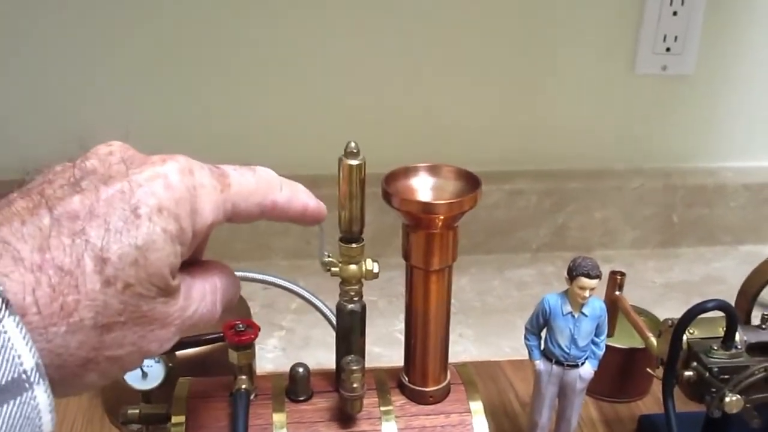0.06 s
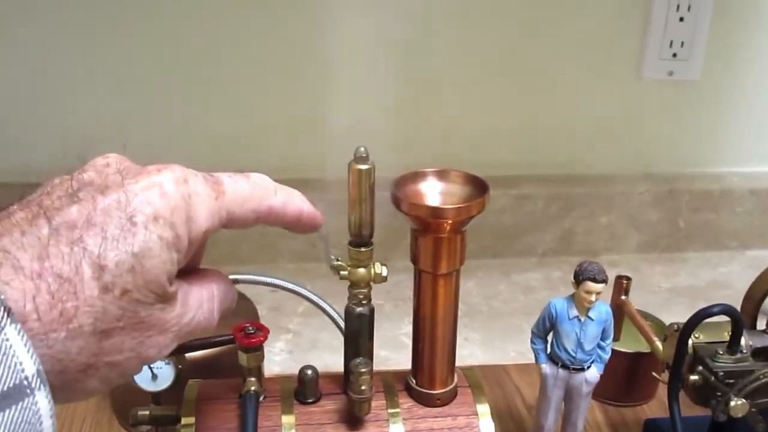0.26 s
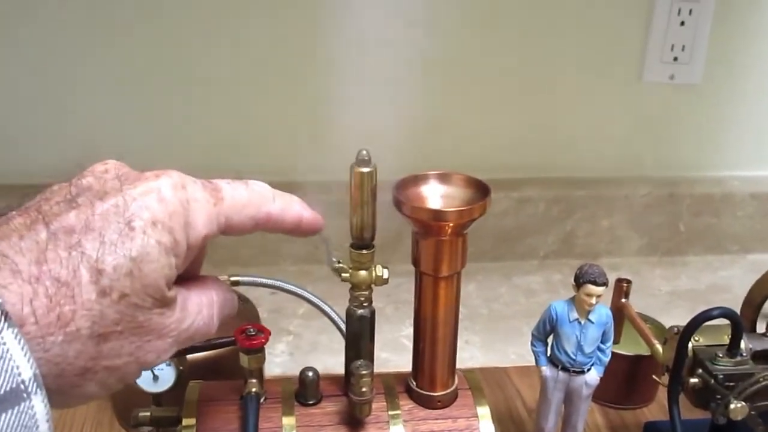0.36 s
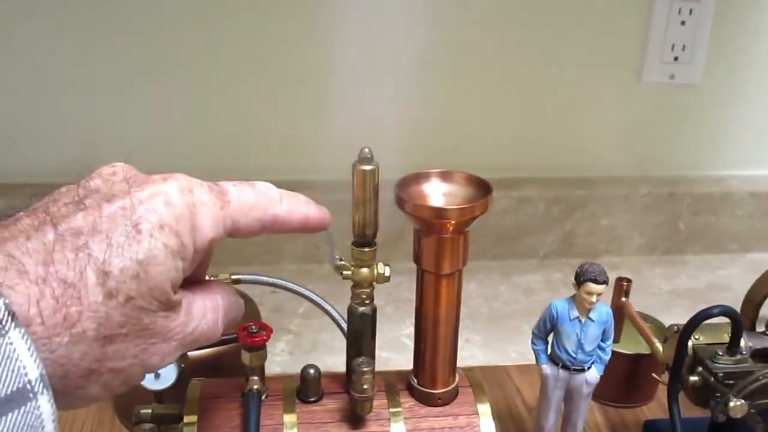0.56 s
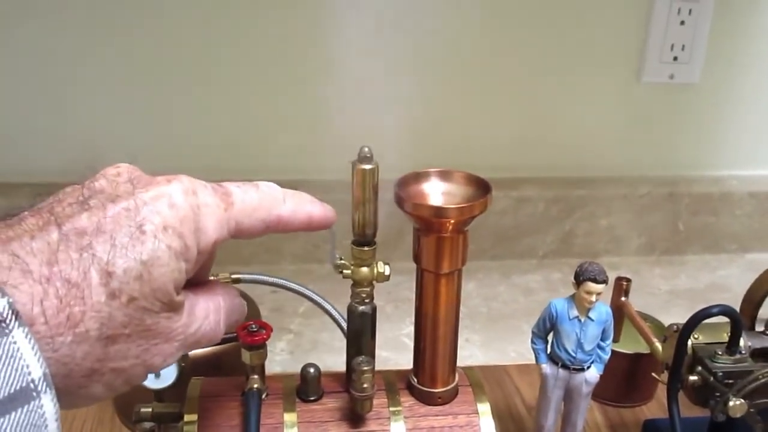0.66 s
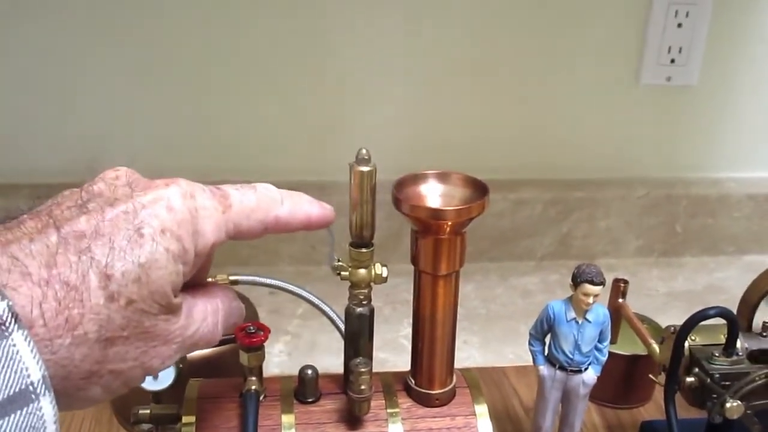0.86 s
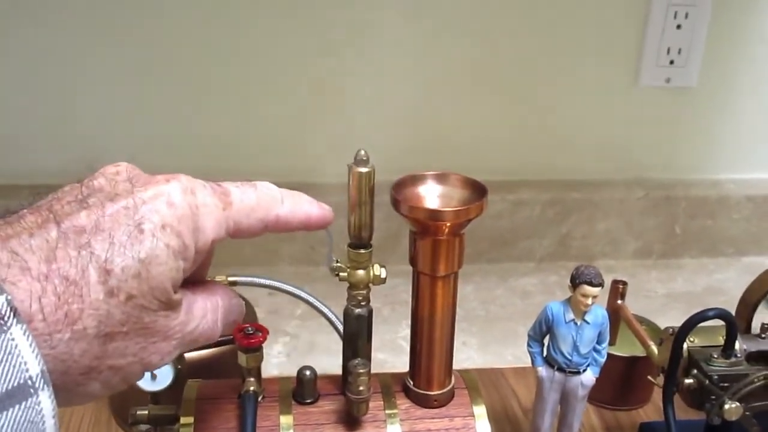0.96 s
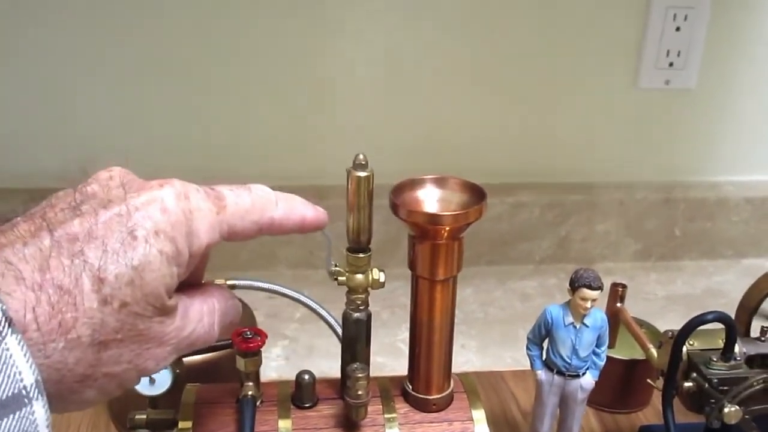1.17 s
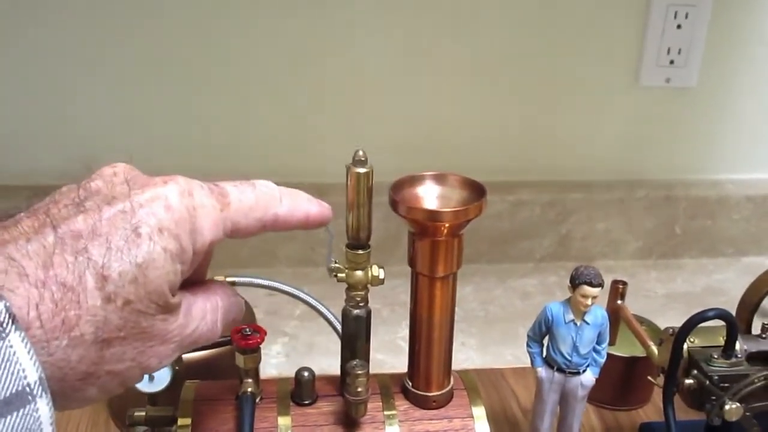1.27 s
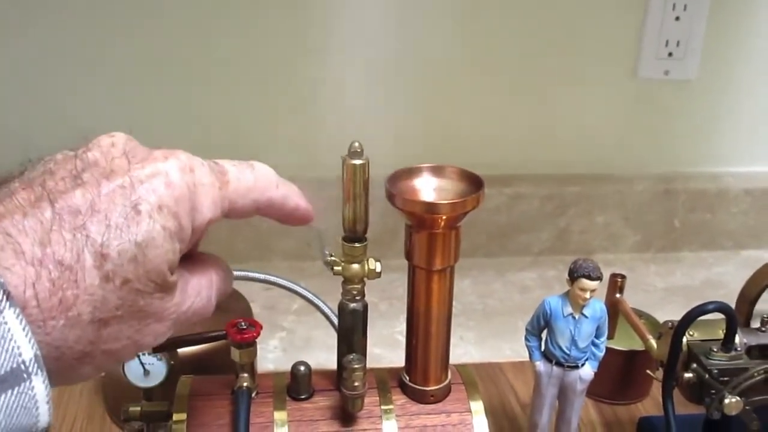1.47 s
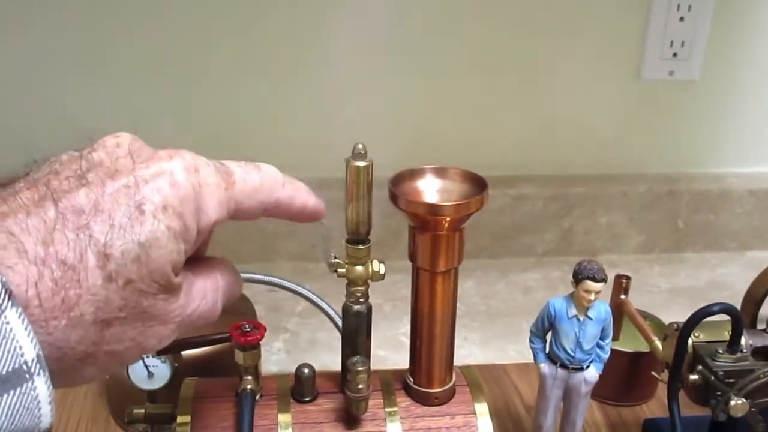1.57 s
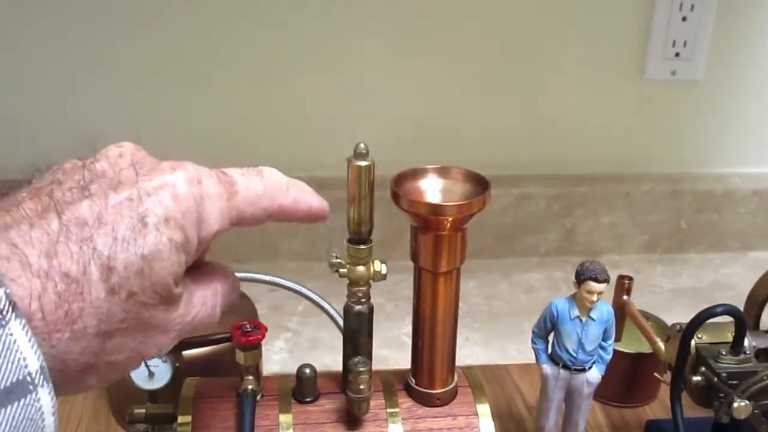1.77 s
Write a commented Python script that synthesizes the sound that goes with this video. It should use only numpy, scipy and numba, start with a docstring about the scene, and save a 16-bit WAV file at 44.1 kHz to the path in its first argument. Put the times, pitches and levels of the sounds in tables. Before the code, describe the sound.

A model steam engine whistle blows twice, high and hoarse with hissing steam, the second blast shorter. Steam leaks between them and a third just begins, over a faint boiler simmer, close by in a small room.

```python
"""A low boiler simmer and a brief faint hiss, then a model steam engine whistles twice in a small room. Wet
steam hisses from the valve and rings the bell near 3 kHz, hoarsely, catching a clean note only in short surges.
The valve leaks between the two blasts, and a third just begins at the very end. An automatic gain control ducks
the level when the whistle gets loud."""
import sys
import numpy as np
from scipy import signal
from scipy.fft import rfft, irfft
from scipy.io import wavfile
from scipy.ndimage import uniform_filter1d, map_coordinates
from numba import njit

SR = 44100
rng = np.random.default_rng(int(sys.argv[2]) if len(sys.argv) > 2 else 0)


def log_audio(samples):
    """Write samples as a 16-bit WAV file to the path given in sys.argv[1]."""
    # one column per channel
    frames = np.atleast_2d(samples).T
    # limit to full scale, then quantise
    limited = np.clip(frames, -1, 1)
    pcm = np.round(limited * 32767).astype(np.int16)
    wavfile.write(sys.argv[1], SR, pcm)


N = 79380  # 1.8 s


def undb(db):
    """Decibels to gain."""
    return 10 ** (np.asarray(db) / 20)


def unit(x):
    """Scale to rms 1."""
    return x / np.sqrt(np.mean(x ** 2))


def pan(x, db):
    """Make the left channel louder than the right by db."""
    return x * undb(np.array([[db], [-db]]) / 2)


def noise(side):
    """Stereo white noise; side sets the width."""
    mid, difference = rng.standard_normal((2, N))
    return mid + side * difference * np.array([[1], [-1]])


def colour(x, points):
    """EQ through (freq_hz, level_db) points joined on a log-frequency axis."""
    hz, db = np.array(points, float).T
    bins_hz = np.maximum(np.arange(N // 2 + 1) * SR / N, 1)
    return irfft(rfft(x) * undb(np.interp(np.log(bins_hz), np.log(hz), db)), N)


def hiss(eq, side, low_cut_hz):
    """Coloured stereo noise with a steep low cut, at rms 1."""
    low_cut = signal.butter(6, low_cut_hz, "high", fs=SR, output="sos")
    return unit(signal.sosfilt(low_cut, colour(noise(side), eq)))


def ring(x, hz, width_hz):
    """A resonance applied twice, at rms 1."""
    b, a = signal.iirpeak(hz, hz / (1.55 * width_hz), fs=SR)
    return unit(signal.lfilter(b, a, signal.lfilter(b, a, x)))


def wander(rate_hz):
    """Smooth random modulation at rms 1."""
    span = max(int(SR / rate_hz), 1)
    smoothed = uniform_filter1d(rng.standard_normal(N), span, mode="wrap")
    return unit(uniform_filter1d(smoothed, span, mode="wrap"))


def gate(t, start, end, attack_s, release_s):
    """Envelope: exponential rise up to start, hold until end, exponential fall."""
    return np.exp(np.minimum(t - start, 0) / attack_s - np.maximum(t - end, 0) / release_s)


# EQ of the simmer: freq_hz, level_db
SIMMER_EQ = [(15, -47), (25, -10), (136, -15), (297, -9.5), (482, -3.5), (919, -10.5), (1240, -6),
             (1380, -15), (1950, -15.5), (2490, -34), (3090, -20), (4260, -31), (10400, -33), (11500, -35),
             (15500, -35)]
# Hollow resonances of the boiler: freq_hz, width_hz, level_db
BOILER_MODES = [(105, 34, -60), (222.5, 19.6, -52), (462, 46, -47), (515.7, 22, -50.5), (638, 50, -48.5),
                (774.7, 28, -51.5), (1177, 33, -59.5)]
# Tones of the boiler's hum: pitch_hz, level_db
HUM_TONES = [(113, -56), (454, -46.5)]
# Fader ride on the whole boiler: time_s, gain_db
BOILER_RIDE = [(0, 0.5), (.11, -1.5), (.4, -3), (.75, 0), (.95, 3), (1.18, 2), (1.45, 0.5), (1.8, 0.5)]
def boiler(t):
    """The bed: the boiler simmers with an uneven low rush, hollow resonances and a wavering hum."""
    simmer_db, flicker_db, waver_db = -42, 3.33, 1.5
    rush = undb(simmer_db) * unit(colour(noise(side=.13), SIMMER_EQ)) * undb(flicker_db * wander(27))
    hollow = sum(undb(db) * ring(noise(side=min(hz / 1500, 1)), hz, width)
                 for hz, width, db in BOILER_MODES)
    hum_clock = np.cumsum(1 + .014 * wander(35)) / SR  # the tones drift in pitch together
    hum = sum(undb(db + waver_db * wander(21)) * np.sqrt(2) * np.sin(2 * np.pi * hz * hum_clock)
              for hz, db in HUM_TONES)
    ride_db = np.interp(t, *np.array(BOILER_RIDE).T)
    return (rush + hollow + hum) * undb(ride_db)


LEAK_START_S, LEAK_END_S, LEAK_DB = .7, 1.53, -27.5
# EQ of the seeping steam: freq_hz, level_db
SEEP_EQ = [(2290, -37), (3900, -18), (5360, -3.5), (6630, -3), (7580, -7), (8070, -4), (8550, -4),
           (9990, -17), (11500, -4), (14100, -8), (15500, -18)]
def seep(t):
    """A thread of steam still escapes once the valve has shut on the second blast."""
    return undb(-45.5) * hiss(SEEP_EQ, side=.34, low_cut_hz=3300) * (t > LEAK_END_S)


# EQ of the spit: freq_hz, level_db
SPIT_EQ = [(1180, -54), (2000, -13), (2870, -11.5), (3370, -0.5), (4960, -29), (5540, -19), (6040, -20),
           (7740, -7.5), (11800, -24), (13900, -14), (15500, -15.5)]
def spit(t):
    """One brief, faint burst of hiss shortly before the first blast."""
    envelope = gate(t, start=.042, end=.054, attack_s=.0018, release_s=.021)
    return undb(-39.5) * hiss(SPIT_EQ, side=.59, low_cut_hz=1900) * envelope


# EQ of the leaking steam: freq_hz, level_db
LEAK_EQ = [(880, -51.5), (1500, -13), (1840, -23), (2050, -22.5), (2470, -9), (2620, -14), (2920, -7),
           (3650, -17), (5500, -11.5), (6620, -13), (8540, -5), (9700, -14), (11400, -1), (12600, -4.5),
           (13700, -1.5), (14600, -4), (15500, -19)]
def leak(t):
    """Steam leaks after the first blast, thinning as the valve settles."""
    sag_db_per_s = 2
    level = undb(LEAK_DB - sag_db_per_s * (t - LEAK_START_S))
    envelope = gate(t, LEAK_START_S, LEAK_END_S, attack_s=.0068, release_s=.009)
    return level * hiss(LEAK_EQ, side=.4, low_cut_hz=990) * envelope


# Valve openings, with steam level and bell pitch: start_s, end_s, level_db, pitch_hz
BLAST_CUES = [(0.24, .712, -15, 3049), (1.385, 1.533, -13.5, 3058), (1.8, 1.9, -17, 2990)]
# EQ of the jet's bright top: freq_hz, level_db
JET_TOP_EQ = [(2290, -38), (3900, -10), (4770, -14), (5360, -11.5), (6600, -13), (7580, -10.5),
              (8120, -3.5), (8900, 0), (9710, -5), (11500, -2.5), (12900, -5), (14100, -2.5), (15500, -13)]
# EQ of the jet's midrange body: freq_hz, level_db
JET_BODY_EQ = [(300, -11), (1000, -5), (1800, -3), (2500, 1), (3400, 2), (3900, -3), (5000, -42)]
def jet(t):
    """Steam spurts as the valve cracks open, then the jet builds while it is held."""
    build_db_per_s, spurt_db, body_db = 4, -3.5, -16
    flow = 0
    for start, end, db, _ in BLAST_CUES:
        held = gate(t, start, end, attack_s=.0062, release_s=.0055)
        build = undb(build_db_per_s * (t - start))
        spurt = undb(spurt_db) * gate(t, start, start, attack_s=.0013, release_s=.0033)
        flow += undb(db) * (held * build + spurt)
    top = hiss(JET_TOP_EQ, side=.43, low_cut_hz=3870)
    body = undb(body_db) * unit(colour(noise(side=.13), JET_BODY_EQ))
    return flow * (top + body)


def puffs(t):
    """A short low puff, 27 dB under the jet, each time the valve cracks open."""
    envelope = sum(undb(db - 27) * gate(t, start, start + .0081, attack_s=.0013, release_s=.0035)
                   for start, _, db, _ in BLAST_CUES)
    return envelope * ring(noise(side=.2), hz=705, width_hz=510)


# Stereo placement of the hiss: freq_hz, left_minus_right_db
HISS_PAN = [(1000, 4.5), (2400, -2), (4400, 0), (8100, 1), (11000, 3), (15000, 7.5)]
def valve(t):
    """The valve's steam: four hisses, flickering slightly and panned by frequency, plus the puffs."""
    left, right = (jet(t) + leak(t) + seep(t) + spit(t)) * undb(.5 * wander(90))
    left = colour(left, [(hz, db / 2) for hz, db in HISS_PAN])
    right = colour(right, [(hz, -db / 2) for hz, db in HISS_PAN])
    return np.array([left, right]) + puffs(t)


# Resonances of the whistle's bell: pitch_ratio, width_hz, level_db
BELL_MODES = [(1, 93, -1.5), (.865, 150, -20), (.95, 300, -7.5), (1.05, 70, -10), (1.118, 175, -13)]
def hoarse_bell(t):
    """Turbulence rings the bell: a breathy tone, faint on the leak and strong on each blast."""
    leak_trim_db, blast_trim_db = -15.5, -2  # relative to the steam
    breath = undb(LEAK_DB + leak_trim_db) * ring(noise(side=.13), hz=2952, width_hz=260)
    breath *= gate(t, LEAK_START_S, LEAK_END_S, attack_s=.01, release_s=.052)
    for start, end, db, hz in BLAST_CUES:
        modes = sum(undb(mode_db) * ring(noise(side=.21), ratio * hz, width)
                    for ratio, width, mode_db in BELL_MODES)
        breath += undb(db + blast_trim_db) * modes * gate(t, start, end, attack_s=.0041, release_s=.011)
    return pan(breath, db=-1.5)


# Surges in which the bell catches its note: start_s, end_s, level_db, pitch_hz
SURGE_CUES = [(0.239, 0.26, -6.5, 3020), (0.329, 0.335, -3.5, 3043), (0.379, 0.446, -9.5, 3036),
              (0.465, 0.478, -9, 3050), (0.522, 0.548, -10.5, 3041), (.578, 0.606, -10, 3037),
              (1.391, 1.398, -4, 3059), (1.456, 1.471, -14, 3090), (1.502, 1.526, -9.5, 3082),
              (1.656, 1.678, -39, 3050)]
def singing_bell(t):
    """The bell catches a clean, fluttering note that starts flat and scoops up to pitch."""
    scoop_hz, scoop_s, flutter_db, left_lag_s = 64.97, .0053, 1.16, 43e-6
    wobble_hz = 8.95 * wander(98.6)
    flutter = undb(flutter_db * wander(170))
    note = 0
    for start, end, db, hz in SURGE_CUES:
        pitch_hz = hz + wobble_hz - scoop_hz * np.exp(-np.maximum(t - start, 0) / scoop_s)
        swell = undb(db) * gate(t, start, end, attack_s=.0028, release_s=.0098)
        note += swell * flutter * np.sqrt(2) * np.sin(2 * np.pi * np.cumsum(pitch_hz) / SR)
    left = map_coordinates(note, [(t - left_lag_s) * SR], mode="nearest")
    return pan(np.array([left, note]), db=-5)


def room(send):
    """Diffuse stereo tail of a small room; the treble dies sooner."""
    body_t60_s, treble_t60_s, predelay_s = .44, .24, .004
    t = np.arange(int(.6 * SR)) / SR
    echoes = rng.standard_normal((2, len(t))) * (t > predelay_s)
    treble = signal.sosfiltfilt(signal.butter(2, 6700, "high", fs=SR, output="sos"), echoes)
    tail = (echoes - treble) * undb(-60 * t / body_t60_s) + treble * undb(-60 * t / treble_t60_s)
    return signal.fftconvolve(send, unit(tail) / np.sqrt(len(t)), axes=1)[:, :N]


def scene():
    """The mix: steam and whistle feed the room, over a dry boiler bed."""
    t = np.arange(N) / SR
    steam = valve(t)
    whistle = hoarse_bell(t) + singing_bell(t)
    reverb = room(undb(-9.5) * steam + undb(-9) * whistle)
    return boiler(t) + steam + whistle + reverb


@njit
def duck(excess_db, attack_s, release_db_per_s):
    """Gain reduction in dB: it chases any excess quickly and lets go at a steady rate."""
    reduction_db, cut = np.empty(len(excess_db)), 0.
    for i in range(len(excess_db)):
        if excess_db[i] > cut:
            cut += (excess_db[i] - cut) / (attack_s * SR)
        else:
            cut = max(cut - release_db_per_s / SR, 0.)
        reduction_db[i] = cut
    return reduction_db


def record(dry):
    """Master chain: low cut, automatic gain that lets attacks through before ducking, steep high cut."""
    low_cut_hz, high_cut_hz, threshold_db = 61, 15700, -14
    dry = signal.sosfilt(signal.butter(2, low_cut_hz, "high", fs=SR, output="sos"), dry)
    power = uniform_filter1d(np.mean(dry ** 2, axis=0), size=256)
    excess_db = 10 * np.log10(np.maximum(power, 1e-12)) - threshold_db
    ducked = dry * undb(-duck(excess_db, attack_s=.013, release_db_per_s=4))
    return signal.sosfilt(signal.ellip(10, .2, 80, high_cut_hz, fs=SR, output="sos"), ducked)


dry = scene()
out = record(dry)
log_audio(out)
```